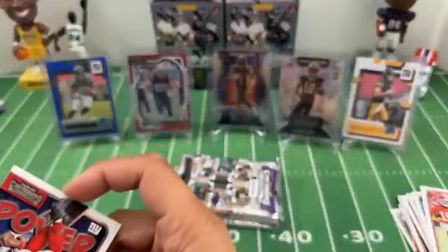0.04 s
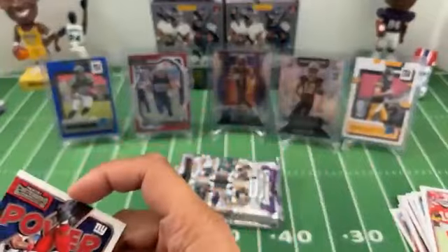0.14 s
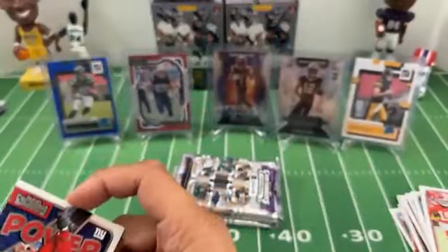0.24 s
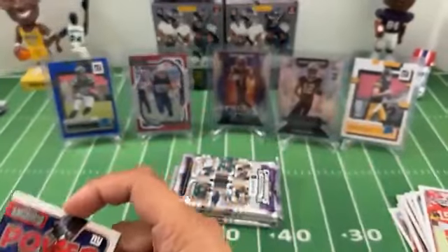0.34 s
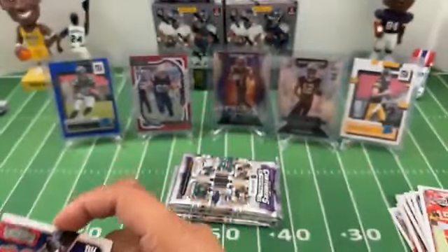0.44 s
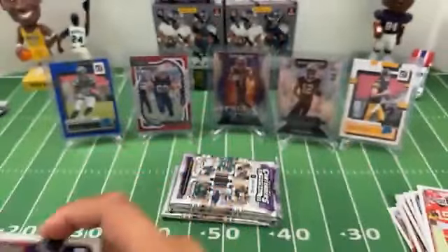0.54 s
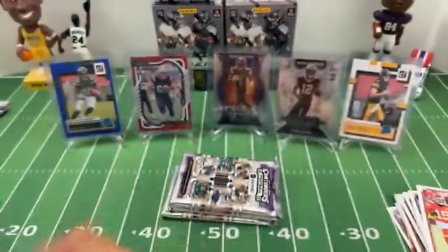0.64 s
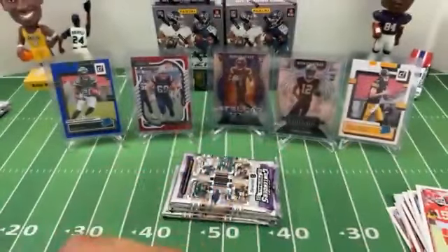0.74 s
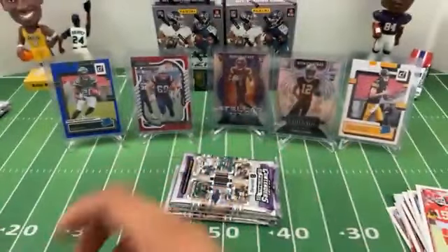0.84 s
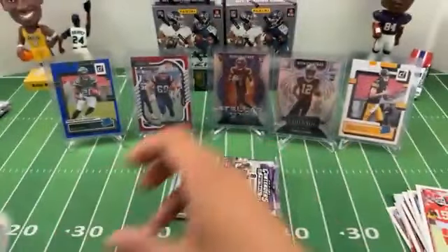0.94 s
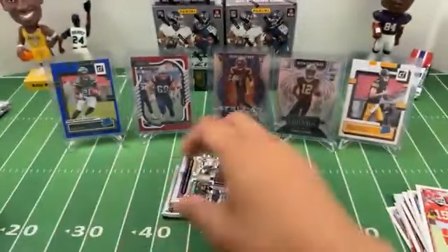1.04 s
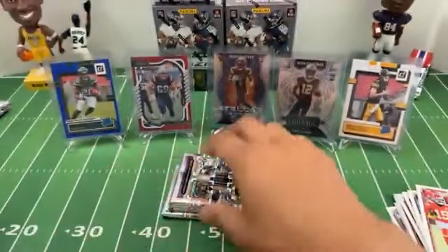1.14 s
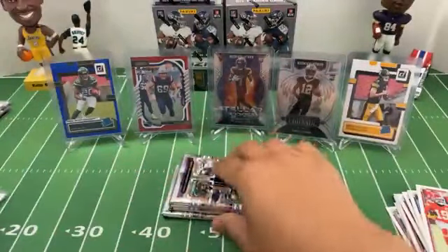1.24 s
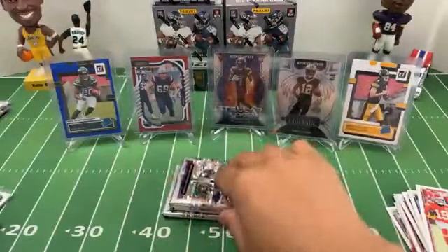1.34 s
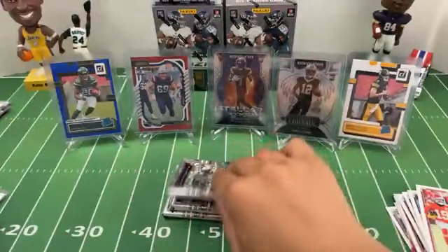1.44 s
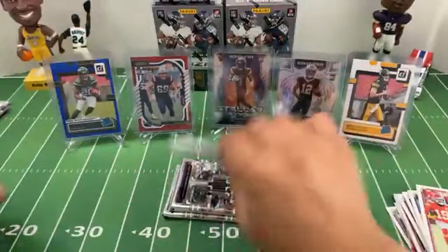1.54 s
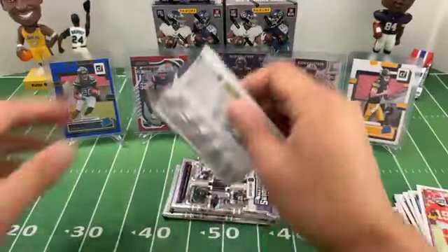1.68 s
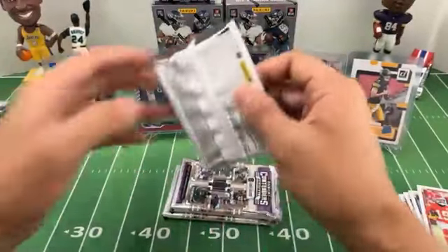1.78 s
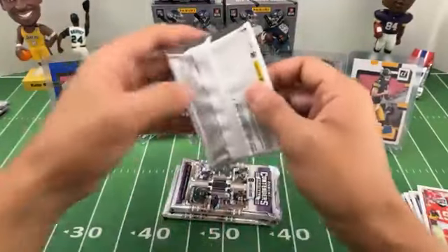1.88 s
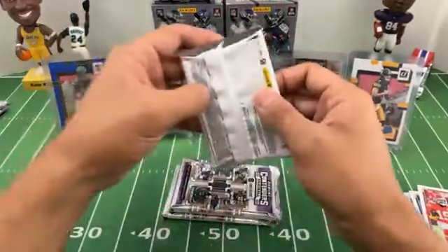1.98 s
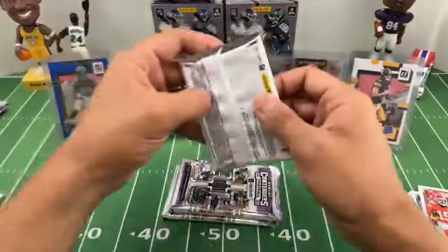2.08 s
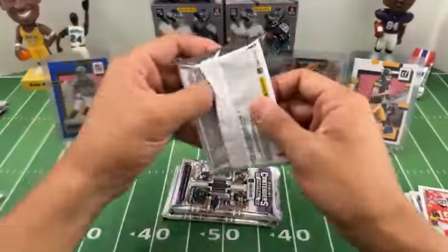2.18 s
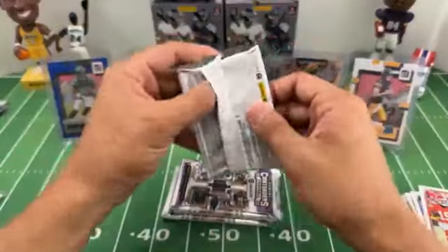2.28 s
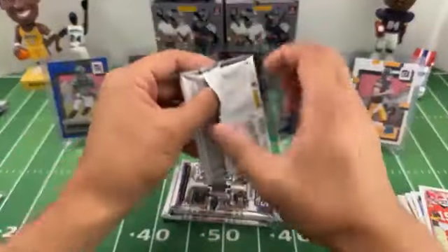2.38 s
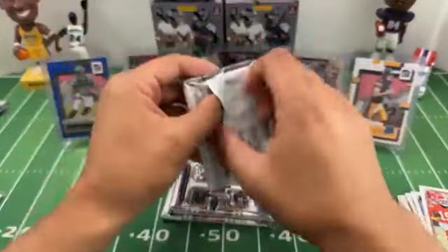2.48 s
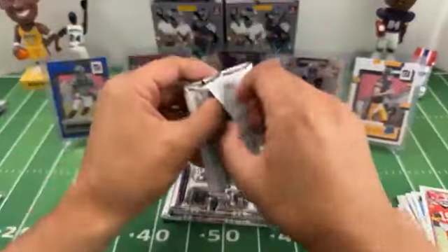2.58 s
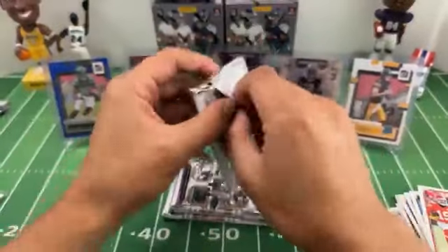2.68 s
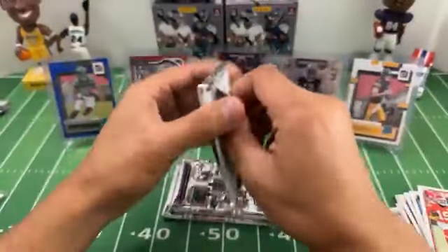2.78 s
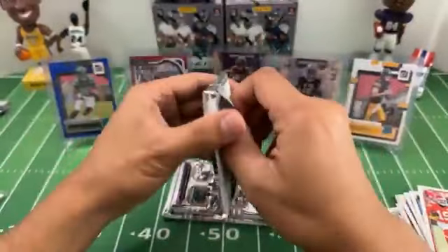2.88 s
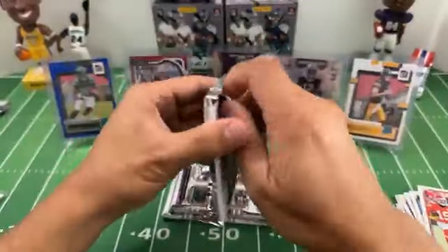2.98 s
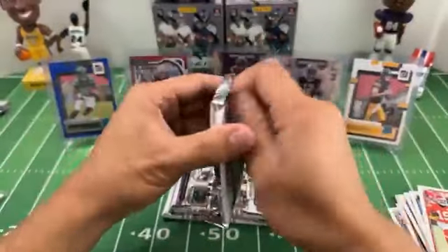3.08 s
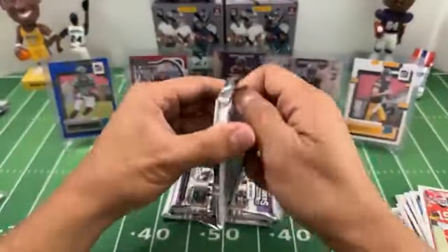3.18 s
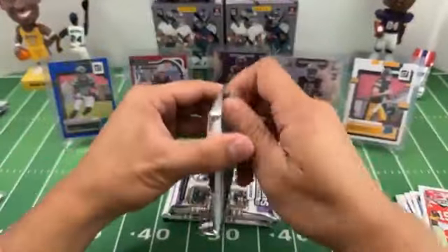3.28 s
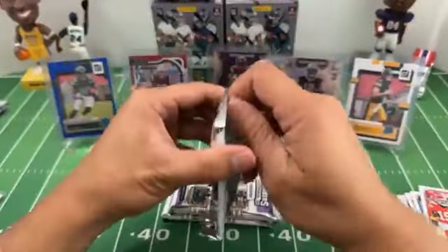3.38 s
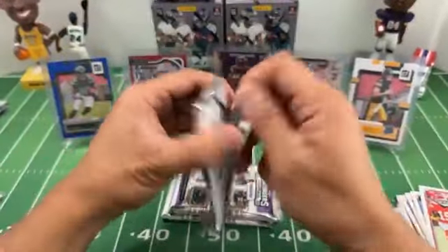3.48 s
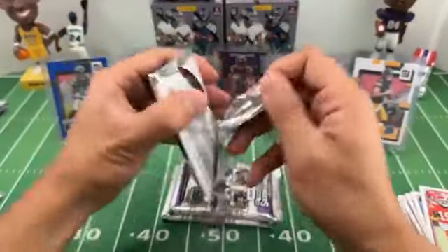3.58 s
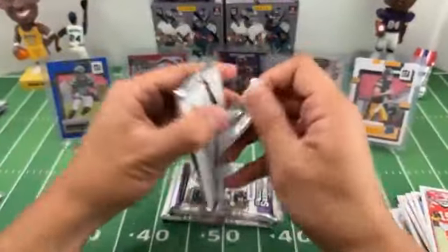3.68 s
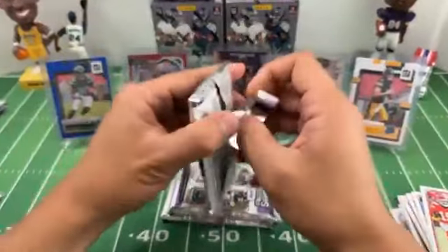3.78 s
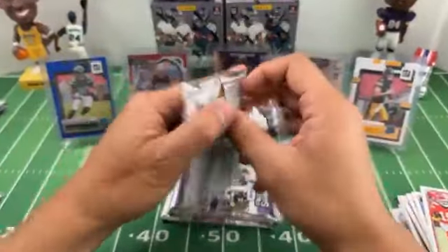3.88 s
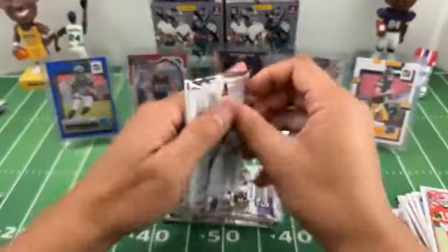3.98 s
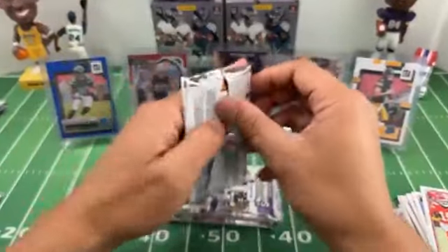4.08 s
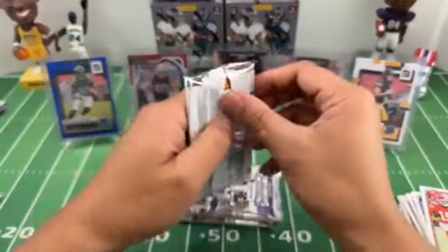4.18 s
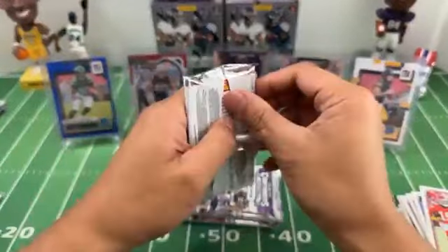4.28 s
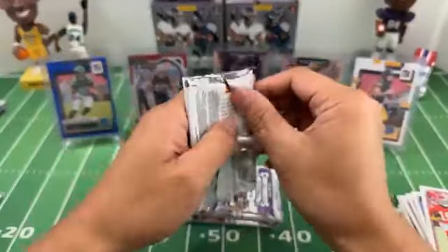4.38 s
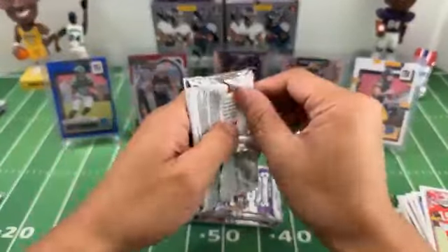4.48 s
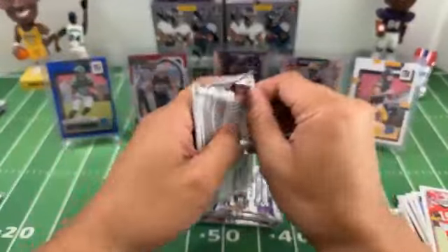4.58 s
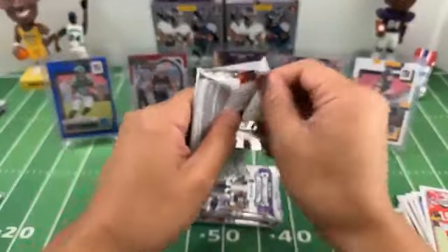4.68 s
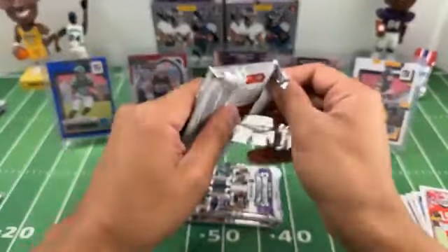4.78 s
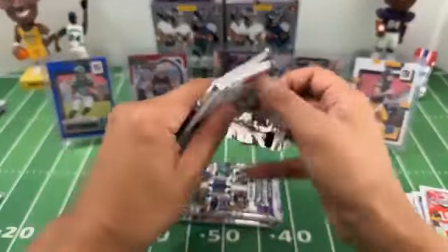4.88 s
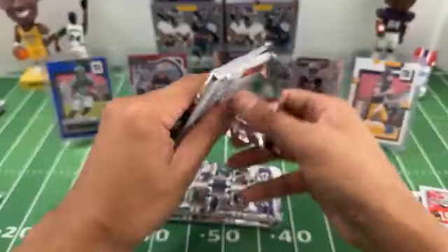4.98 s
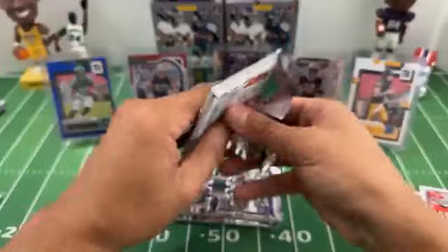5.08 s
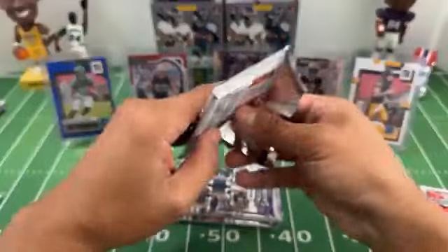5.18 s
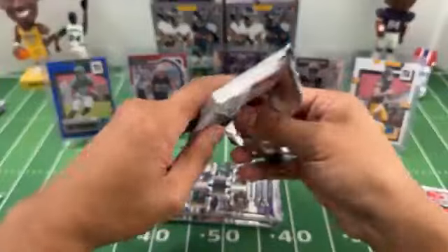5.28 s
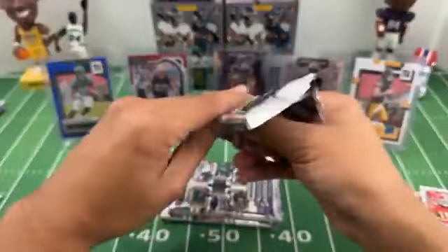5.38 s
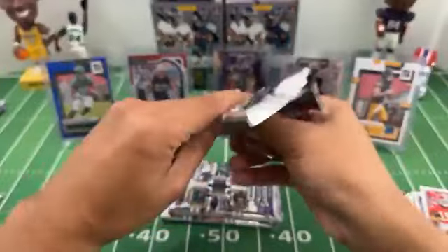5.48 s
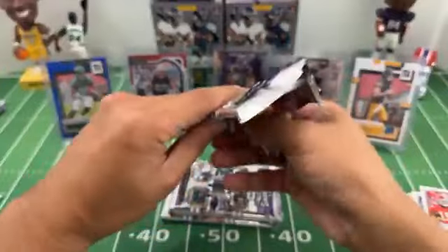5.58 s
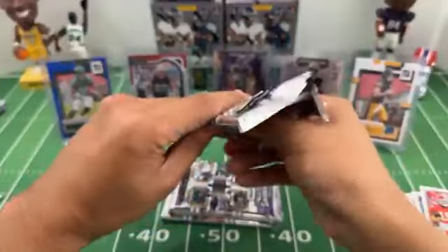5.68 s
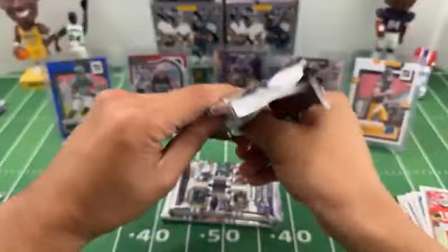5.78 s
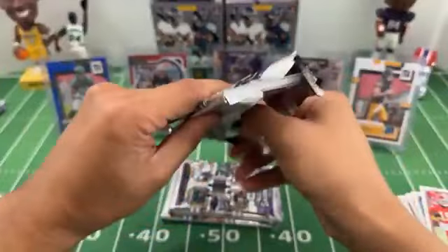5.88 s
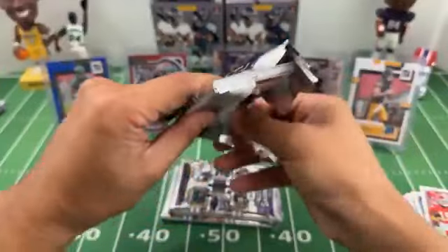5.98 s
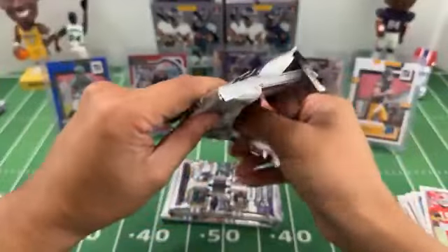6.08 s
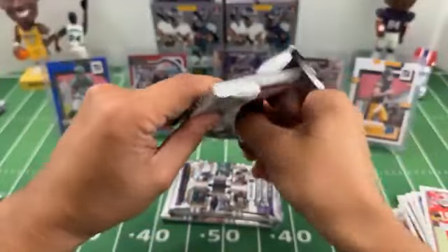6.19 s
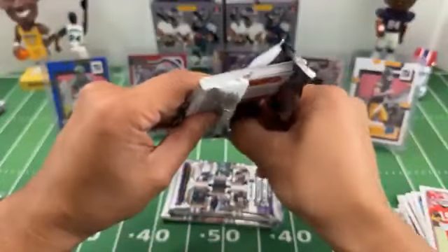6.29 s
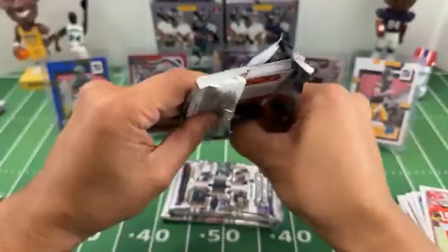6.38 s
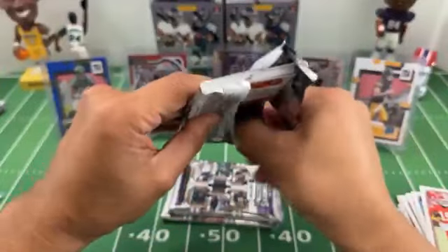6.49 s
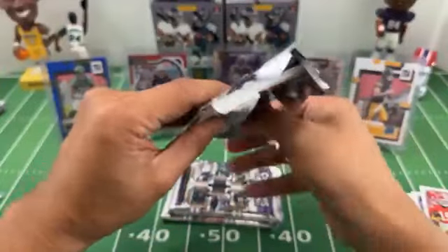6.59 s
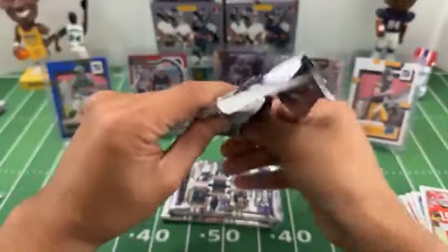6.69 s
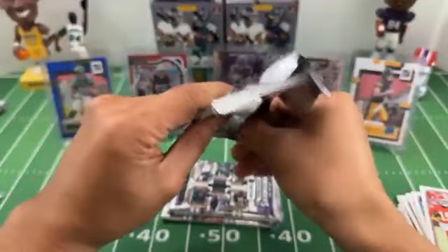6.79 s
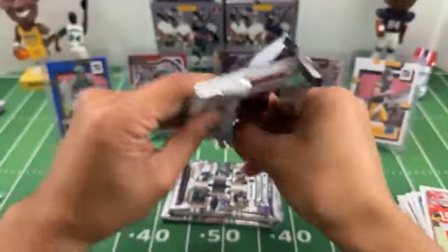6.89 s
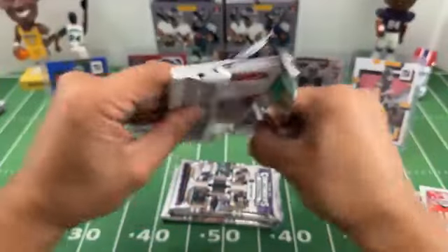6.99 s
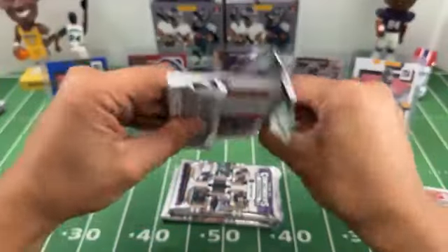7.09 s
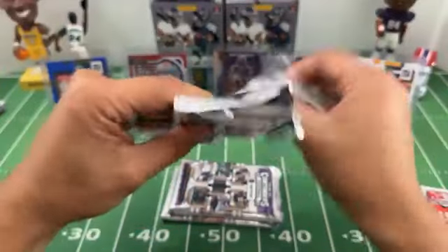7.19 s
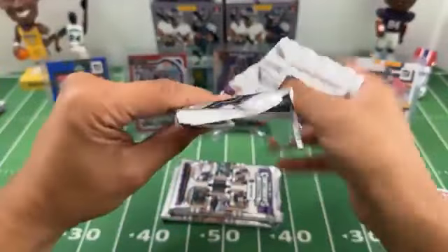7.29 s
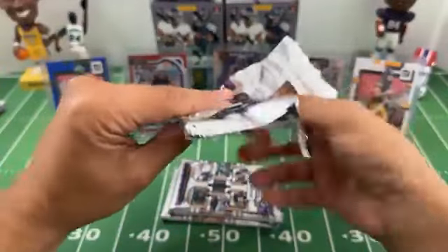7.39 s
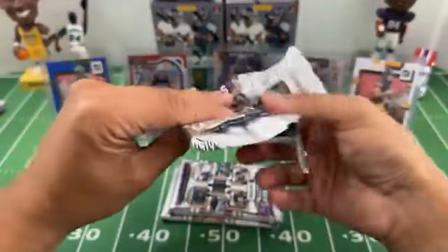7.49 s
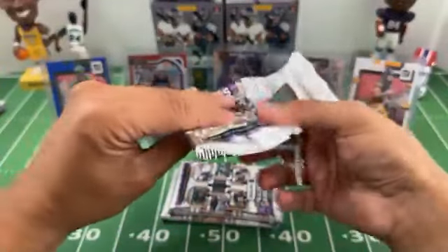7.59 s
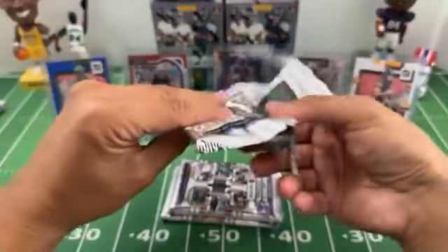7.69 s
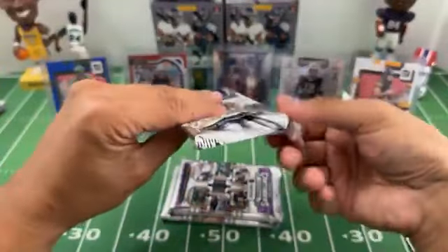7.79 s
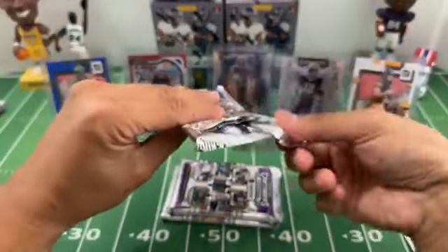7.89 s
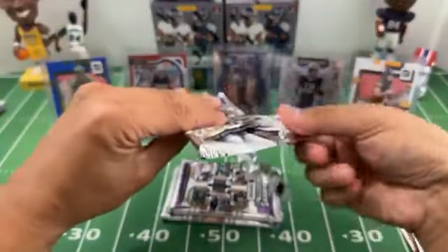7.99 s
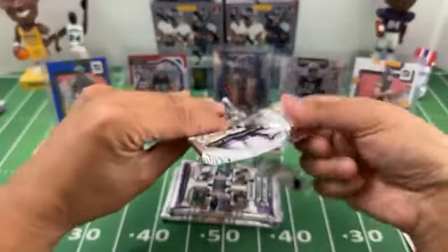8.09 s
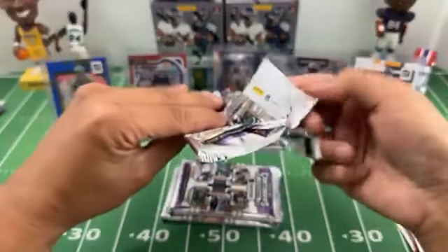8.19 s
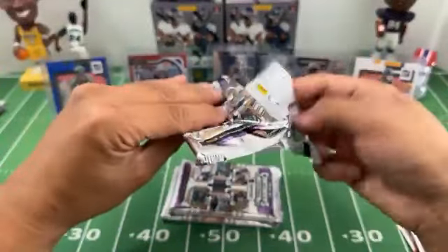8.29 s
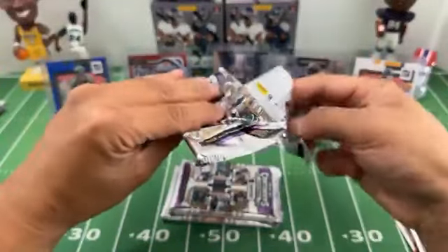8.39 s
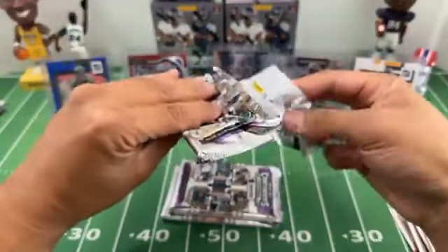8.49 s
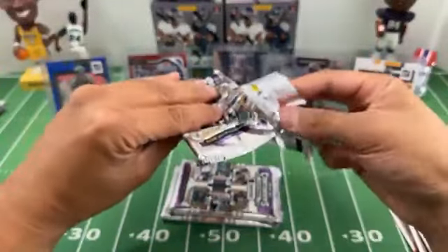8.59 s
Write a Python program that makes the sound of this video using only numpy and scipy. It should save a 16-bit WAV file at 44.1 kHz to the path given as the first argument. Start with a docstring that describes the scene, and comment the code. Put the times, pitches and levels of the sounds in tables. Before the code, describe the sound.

Quiet card taps and soft sliding give way to bright, crackling foil as hands work open and peel back a small wrapper in a small room.

```python
"""A small room with a faint hiss and mains hum; hands over a desk, close to a camera's microphone.
They put down a few cards, pick up a foil card pack, pinch its seam and tear it open in several pulls.
Foil facets buckle in sharp noise bursts that ring their modes, over a bed of tiny creases and sliding
hiss; the stiff pack bumps softly as damped low tones. Treble of the crinkling spreads to the sides."""
import sys
import numpy as np
from scipy import signal
from scipy.fft import rfft, irfft, next_fast_len
from scipy.io import wavfile
from scipy.ndimage import uniform_filter1d

SR = 44100
rng = np.random.default_rng(int(sys.argv[2]) if len(sys.argv) > 2 else 0)


def bounce(signal):
    """Save signal as a 16-bit WAV file at the path given by the first command-line argument."""
    frames = np.transpose(np.atleast_2d(signal))
    limited = np.clip(frames, -1, 1)
    pcm = np.round(limited * 32767).astype(np.int16)
    wavfile.write(sys.argv[1], SR, pcm)


N = 381465


def amp(db):
    """Decibels to gain."""
    return 10 ** (np.asarray(db) / 20)


def unit(x):
    """Scale to rms 1."""
    return x / np.sqrt(np.mean(x ** 2) + 1e-20)


def along(points, hz):
    """Read (frequency [Hz], value) points on a log frequency axis."""
    point_hz, value = np.transpose(points)
    return np.interp(np.log(hz + 1), np.log(point_hz + 1), value)


def filtered(x, response):
    """Multiply the spectrum of x by a response of frequency."""
    size = next_fast_len(N + 8192)
    hz = np.fft.rfftfreq(size, 1 / SR)
    return irfft(rfft(x, size) * response(hz), size)[..., :N]


def noise(spectrum):
    """Coloured noise of rms 1; only the shape of the spectrum counts."""
    return unit(filtered(rng.standard_normal(N), lambda hz: amp(along(spectrum, hz))))


def wobble(rate):
    """A random curve of straight lines between knots, rate knots a second."""
    knots = rng.standard_normal(N // 16)
    return np.interp(np.arange(N) * rate / SR, np.arange(len(knots)), knots)


def band(hz, lo_hz, hi_hz, order=3):
    """Causal band-pass response."""
    b, a = signal.butter(order, [lo_hz, hi_hz], "bandpass", analog=True)
    return signal.freqs(b, a, hz)[1]


def resonance(hz, ring_hz, q):
    """Causal response of one mode, 1 at its peak."""
    ratio = hz / ring_hz
    return 1j * ratio / (q * (1 - ratio ** 2) + 1j * ratio)


def placed(times, sounds):
    """Sum short sounds, one a row, at their start times in seconds."""
    first = np.round(np.maximum(times, 0) * SR).astype(int)
    index = first[:, None] + np.arange(sounds.shape[1])
    return np.bincount(index.ravel(), sounds.ravel(), N)[:N]


# colour of the faint background hiss: (frequency [Hz], relative level [dB per Hz])
HISS_COLOUR = [(20, -30), (42, -19), (62, -4), (100, -5), (200, -9), (400, -19), (900, -25), (2800, -32),
               (5000, -26.5), (9000, -31), (13000, -70)]
# mains hum tones: (frequency [Hz], rms level before its wander [dB])
HUM_TONES = [(119.8, -73.7), (60, -86)]


def background():
    """Faint background hiss as coloured noise, and mains hum as two sines whose level wanders together."""
    t = np.arange(N) / SR
    tones = sum(amp(db) * np.sqrt(2) * np.sin(2 * np.pi * hz * t) for hz, db in HUM_TONES)
    hum = tones * amp(1.3 * wobble(9))
    return amp(-73.0) * noise(HISS_COLOUR) + hum


ROOM_DB = -6  # gain of the room's answer re the direct sound

# how long the room rings: (frequency [Hz], time to fall 60 dB [s])
ROOM_T60 = [(150, 0.32), (600, 0.26), (2000, 0.26), (6000, 0.27), (12000, 0.37)]


def room(x, size=8192):
    """The diffuse answer of the room: decaying noise, drawn anew so no fixed tones build up."""
    pieces = np.pad(x, (0, -N % size)).reshape(-1, size)  # one tail for each short stretch
    hz, t, z = signal.stft(rng.standard_normal((len(pieces), 2 * size)), SR, nperseg=256)
    decay = amp(-60 * t / along(ROOM_T60, hz)[:, None])
    onset = 1 - np.exp(-t / 0.00039)
    tails = signal.istft(z * decay * onset, SR, nperseg=256)[1]
    tails /= np.linalg.norm(tails, axis=1, keepdims=True)
    starts_s = np.arange(len(pieces)) * size / SR
    return placed(starts_s, signal.fftconvolve(pieces, tails, axes=1))


DESK_DB, DESK_DELAY_S, DESK_SWING = -10, .0007, .25  # gain, median delay and its log spread


def desk(x):
    """One early reflection from the desk, its delay swinging with the height of the hands."""
    n = np.arange(N)
    delay_s = DESK_DELAY_S * np.exp(DESK_SWING * wobble(5))
    mirrored = np.interp(n - SR * delay_s, n, x)
    reflection = filtered(mirrored, lambda hz: hz / (hz + 900))  # less bass comes back
    return (x + amp(DESK_DB) * reflection) / np.hypot(1, amp(DESK_DB))


# soft knocks of hands, cards and pack: (time [s], level before a 2 dB cut [dB], pitch [Hz])
KNOCKS = [(0.052, -50.5, 350), (0.125, -47, 350), (0.367, -49, 361), (1.021, -54, 155), (1.42, -61.5, 141),
          (1.487, -62, 90), (2.135, -49.5, 247), (2.137, -42.5, 88.4), (2.535, -46.5, 219),
          (2.544, -47.5, 122), (3.085, -31, 766), (3.654, -37, 220), (3.664, -40.5, 71), (5.07, -43, 573),
          (5.086, -38, 405), (5.142, -50, 470), (5.351, -55, 91), (5.579, -41, 374), (5.608, -37.5, 417),
          (6.099, -40, 318), (6.124, -36, 364), (7.12, -35, 430), (7.152, -35, 495), (7.172, -37, 83.5),
          (7.59, -33, 566), (7.954, -36, 390), (8.031, -43.5, 110.3), (8.343, -49, 79.5)]


def bumps(rise=1.2, cycles=14.5, rough=0.83):
    """A soft knock swells and dies within a few cycles, its phase blurred by the damping of the hand."""
    s, db, hz = np.transpose(KNOCKS)
    turns = hz[:, None] * np.arange(SR // 4) / SR
    shape = (1 - np.exp(-(turns / rise) ** 2)) * amp(-60 * turns / cycles)  # falls 60 dB in `cycles`
    blur = np.array([np.interp(u, np.arange(256), rng.standard_normal(256)) for u in turns])
    push = np.sin(2 * np.pi * turns + rough * blur)
    return placed(s, amp(db - 2.0)[:, None] * shape / shape.max() * push)


def patchy(x, depth_db=3.2):
    """A scrape catches on one spot after another, and each spot has its own colour."""
    z = signal.stft(x, nperseg=512)[2]
    field = uniform_filter1d(rng.standard_normal(z.shape), size=6, axis=0)
    field = uniform_filter1d(field, size=5, axis=1)
    return unit(signal.istft(z * amp(depth_db * unit(field)), nperseg=512)[1][:N])


# colour of card sliding on card or foil: (frequency [Hz], relative level [dB per Hz])
SLIDE_COLOUR = [(300, -13), (1200, -11.5), (2900, -9), (4000, -1.5), (5500, -1.5), (8000, -5.5),
                (10000, -15), (13000, -27)]
# cards and packs sliding over each other:
# (start [s], end [s], stroke gain before slips [dB], glossy sheen before halving [dB re stroke])
SLIDE_STROKES = [(0.47, 0.72, -71.5, -4), (0.737, 0.924, -68.5, -1), (1.093, 1.42, -75.5, -18),
                 (1.358, 1.707, -67, -20), (1.633, 1.78, -63.5, -11), (1.803, 1.917, -67, -15.5),
                 (2.277, 2.358, -65, -17), (7.666, 7.743, -47, -14), (8.268, 8.316, -53, -10)]


def sliding():
    """Cards and packs hiss as they slide, each stroke swelling and fading in uneven little slips."""
    t = np.arange(N) / SR
    start, end, db, sheen_db = np.transpose(SLIDE_STROKES)[..., None]
    progress = np.clip((t - start) / (end - start), 0, 1)
    strokes = amp(db) * np.sin(np.pi * progress)
    sheen = unit(filtered(rng.standard_normal(N), lambda hz: band(hz, 6900, 12500)))
    rub = strokes.sum(axis=0) * patchy(noise(SLIDE_COLOUR))
    gloss = (amp(sheen_db) * strokes).sum(axis=0) * sheen / 2
    slips = amp(2.5 * wobble(220) + 1.5 * wobble(25))
    return (rub + gloss) * slips


# colour of the pack shifting in the grip: (frequency [Hz], relative level [dB per Hz])
HANDLING_COLOUR = [(25, -26), (60, -35.5), (90, 6.5), (170, -2), (400, -4.5), (800, -24), (2000, -2),
                   (9000, -17)]


def pack_shifting(flex_db):
    """The pack shifts in the grip: coloured noise that follows the flexing of the sheet."""
    return amp(flex_db - 7.0) * noise(HANDLING_COLOUR)


def grip(crinkle_db, yield_db=-71, soft_db=4.5):
    """Near 0 while the fingers only slide, near 1 once they press hard enough to crease the foil."""
    return 1 / (1 + np.exp((yield_db - crinkle_db) / soft_db))


def scuffing(crinkle_db, flex_db):
    """Fingers scuff the sheet: patchy noise that gives way to creasing as the grip hardens."""
    # (frequency [Hz], relative level [dB per Hz])
    scuff_colour = [(150, 1.5), (350, 3.0), (1100, -8.5), (2500, -3.0), (6000, -37)]
    sliding_share = 1 - grip(crinkle_db, yield_db=-65.5)
    return sliding_share * amp(flex_db + 6.1 * wobble(70)) * patchy(noise(scuff_colour))


# a squeeze takes hold, is held, and lets go
ATTACK_S, RELEASE_DB_PER_S, FLEX_RELEASE_DB_PER_S = .011, 260, 197
# after a snap the foil goes on creasing and flexing, and settles; levels re the snap
SETTLE_DB, SETTLE_FLEX_DB, SETTLE_DB_PER_S = -29, -10, 279.5

# squeezes and pulls of the fingers: cards put down and pack picked up, seam pinched until it gives,
# prised open, the long rip, the wrapper peeled back. Levels drive the layers, before their own gains:
# (start [s], length [s], crinkle level [dB], sheet flex level [dB])
FINGER_SQUEEZES = [(0.032, .34, -70, -70), (0.8, .05, -69, -73), (0.865, .03, -59, -63.5),
                   (1.404, .1, -73, -71), (1.679, .04, -58, -72.5), (2.311, .06, -53, -66.5),
                   (2.375, .06, -41, -60), (2.717, .09, -48, -61), (2.843, .045, -45, -58.5),
                   (2.919, .3, -54, -69.5), (3.08, .05, -45, -78), (3.243, .07, -41, -54),
                   (3.439, .04, -43, -69), (3.501, .13, -51, -68), (3.651, .07, -35, -38),
                   (3.771, .12, -47, -55.5), (4.005, .11, -47.5, -53.5), (4.207, .13, -64, -69.5),
                   (4.37, .13, -71, -78.5), (4.528, .05, -53, -54), (4.719, .07, -41, -52),
                   (4.822, .07, -50, -51.5), (4.892, .035, -35, -53.5), (5.055, .045, -43, -50.5),
                   (5.187, .21, -52, -55.5), (5.431, .03, -44, -51.5), (5.521, .1, -45, -53),
                   (5.663, .045, -39, -52.5), (5.844, .085, -40, -48), (6.06, .06, -46, -49),
                   (6.181, .06, -45, -51), (6.311, .19, -51, -57.5), (6.653, .14, -53, -51.5),
                   (6.856, .12, -44, -50), (7.041, .145, -41, -50.5), (7.106, .035, -33.5, -42.5),
                   (7.292, .04, -49, -56), (7.349, .06, -48.5, -44), (7.448, .43, -63, -60.5),
                   (7.578, .03, -51, -45), (7.903, .14, -54, -58), (8.05, .08, -50, -55),
                   (8.172, .05, -60, -59.5), (8.428, .035, -52, -61), (8.28, .29, -61, -59.5),
                   (8.325, .03, -50, -63), (8.604, .045, -58, -49.5)]


def work():
    """Crinkle and flex levels in dB per sample: the squeezes, and the settling after each snap."""
    t = np.arange(0, N, 32) / SR
    start, length, crinkle_db, flex_db = np.transpose(FINGER_SQUEEZES)[..., None]
    s, snap_db, snap_flex_db = np.transpose(FOIL_SNAPS)[:3, :, None]
    taking_hold = np.clip(1 + (t - start) / ATTACK_S, 0, 1)
    let_go_s = np.maximum(t - start - length, 0)
    settling = (t > s) * amp(-SETTLE_DB_PER_S * np.abs(t - s))

    def level(held_db, release_db_per_s, settle_db):
        """Add the power of all squeezes and settlings."""
        squeezed = taking_hold * amp(held_db - release_db_per_s * let_go_s)
        parts = np.vstack([squeezed, settling * amp(settle_db)])
        level_db = 10 * np.log10(np.sum(parts ** 2, axis=0) + 1e-10)
        return np.interp(np.arange(N) / SR, t, level_db)

    crinkling = level(crinkle_db, RELEASE_DB_PER_S, snap_db + SETTLE_DB)
    flexing = level(flex_db, FLEX_RELEASE_DB_PER_S, snap_db + snap_flex_db + SETTLE_FLEX_DB)
    return crinkling, flexing


OVERTONE_DB, OVERTONE_Q = 6, 9


def overtones(hz, facets, count=3):
    """The further modes of each facet, one response a row: no two facets have the same shape."""
    low_hz, high_hz = 1500, 10000
    position = (np.arange(count)[:, None] + rng.random((facets, count, 1))) / count
    modes_hz = low_hz * (high_hz / low_hz) ** position
    return amp(OVERTONE_DB) * resonance(hz, modes_hz, OVERTONE_Q).sum(axis=1)


SNAP_S = .0054  # each part of a buckle has its energy set as rms 1 over this time
STUTTER_DB = 2.6  # a fold runs across its facet in uneven jerks
SHEET_DB, SHEET_HZ, SHEET_OCTAVES, SHEET_Q = 9, 340, 1.5, 8  # one low sheet mode, this pitch upwards


def buckles(level_db, flex_db, edge_db, ring_hz, t60, rise, linger, ring_db, ring_q, dulling, size=1024):
    """A facet flips: a crack that rings it, a crisp edge, and a slower flex of the sheet around it."""
    t, hz = np.arange(size) / SR, np.fft.rfftfreq(size, 1 / SR)
    settings = level_db, flex_db, edge_db, ring_hz, t60
    level_db, flex_db, edge_db, ring_hz, t60 = (np.reshape(v, (-1, 1)) for v in settings)
    jerks = amp(STUTTER_DB * rng.standard_normal((len(t60), size // 32))).repeat(32, axis=1)

    def burst(life, response):
        """Jerky noise that rises and decays, then drives the response."""
        shape = (1 - np.exp(-(t / rise) ** 2)) * amp(-60 * t / life)
        y = irfft(rfft(rng.standard_normal(shape.shape) * shape * jerks) * response)
        return y / np.sqrt(np.sum(y ** 2, axis=1, keepdims=True) / (SNAP_S * SR))

    facet = 1 + amp(ring_db) * resonance(hz, ring_hz, ring_q)
    # a slack sheet that flexes much cracks duller than a taut one
    slackness = np.clip(flex_db + 24.0, -12, 10)
    tilt = amp(-dulling * slackness * np.log2(np.clip(hz, 1400, 4500) / 4000))
    crack = burst(t60, band(hz, 1164, 7700) * (facet + overtones(hz, len(ring_hz))) * tilt)
    edge = burst(t60, band(hz, 6270, 12200))
    sheet_hz = SHEET_HZ * 2 ** (SHEET_OCTAVES * rng.random(t60.shape))
    sheet = amp(SHEET_DB) * resonance(hz, sheet_hz, SHEET_Q)
    flex = burst(linger * t60, band(hz, 330, 1580) * (facet + sheet))
    return amp(level_db) * (crack + amp(edge_db) * edge + amp(flex_db) * flex)


CREASE_DB, CREASE_SCATTER_DB, CREASE_T60_S = -6, 4.3, .016  # gain, spread of strength, median life
CREASE_HZ, CREASE_DROP_OCT_PER_DB = 4500, 0.84  # facets ring lower the more the sheet flexes
CREASE_RING_DB, CREASE_RING_Q = 11, 8
SAME_FOLD_SHARE, SAME_FOLD_SPREAD = .45, .06  # share of creases near a snap's pitch, log spread


def creases(crinkle_db, flex_db, count=1700):
    """Tiny buckles at random: harder work makes them both denser and louder."""
    density = amp(.3 * crinkle_db) * (grip(crinkle_db) + .25)
    rate = density * count * SR / density.sum()  # creases a second
    ticks = np.arange(count) + 2 * rng.random(count)
    at = np.searchsorted(np.cumsum(rate) / SR, ticks).clip(0, N - 1)
    strength, facet, bright, slack = rng.standard_normal((4, count)).clip(-2, 2)
    # share the crinkle power among the creases
    level_db = crinkle_db[at] - 10 * np.log10(rate[at] * SNAP_S) + CREASE_SCATTER_DB * strength
    sheet_db = flex_db[at] - crinkle_db[at]

    # some creases run along the fold of the nearest snap and ring like it
    snap_s, _, _, _, snap_hz, _ = np.transpose(FOIL_SNAPS)
    nearest = np.abs(at[:, None] / SR - snap_s).argmin(axis=1)
    fold_hz = snap_hz[nearest] * np.exp(SAME_FOLD_SPREAD * facet)
    # the ring of the others wanders together
    drop_oct = CREASE_DROP_OCT_PER_DB * np.maximum(sheet_db + 12.5, 0)
    free_hz = CREASE_HZ * np.exp(0.22 * facet + 0.32 * wobble(35)[at]) * 2 ** -drop_oct
    ring_hz = np.where(rng.random(count) < SAME_FOLD_SHARE, fold_hz, free_hz)

    t60 = CREASE_T60_S * np.exp(0.72 * slack)
    sounds = buckles(level_db, sheet_db - 4.0 + 2.0 * slack, -7 + 1.8 * bright, ring_hz, t60,
                     rise=0.000082, linger=1.57, ring_db=CREASE_RING_DB, ring_q=CREASE_RING_Q,
                     dulling=0.068, size=512)
    return amp(CREASE_DB) * placed(at / SR, grip(crinkle_db[at])[:, None] * sounds)


CRACK_DB, FLEX_DB, EDGE_DB = -14, 9.5, 13  # gains added to the table's strength, flex and edge
SNAP_RING_DB, SNAP_RING_Q = 10, 7
# neighbouring facets: gain re the snap, furthest offset, life re the snap's
LEAD_DB, LEAD_S, LEAD_LIFE = -14, .0052, 1
FOLLOW_DB, FOLLOW_S, FOLLOW_LIFE = -11, .007, 1

# the clearest single buckles of the foil, the first few of them ticks of cards; before the gains above:
# (time [s], strength [dB], sheet flex [dB re strength], crisp edge [dB re strength],
#  facet ring [Hz], time for the crack to fall 60 dB [s])
FOIL_SNAPS = [(0.044, -46, -13, -11.5, 1005, 0.023), (0.05, -39, -10.5, -11, 895, 0.019),
              (0.118, -48, -5, -10, 1107, 0.022), (0.1257, -48, -9, -13, 960, 0.016),
              (0.197, -41, -18, -42, 3840, 0.03), (0.252, -32, -42.5, -14.5, 8430, 0.014),
              (0.3289, -31, -20, -10.5, 8650, 0.0098), (0.3649, -39, -15, -25, 1036, 0.015),
              (0.5724, -46, -12, -30, 1230, 0.0076), (0.868, -30, -24, -9.5, 8040, 0.012),
              (0.9619, -34.5, -24, -11.5, 6160, 0.0098), (1.3132, -47, -18.5, -13, 4900, 0.025),
              (1.408, -53.5, -7.5, -19, 1060, 0.027), (1.4583, -51, -16, -25, 1167, 0.015),
              (1.5556, -50, -27, -19, 5150, 0.016), (1.6541, -41, -24.5, -21, 5200, 0.018),
              (1.6847, -38.5, -18, -12, 5660, 0.014), (1.842, -34.5, -23, -18.5, 7100, 0.01),
              (2.0797, -43, -15, -10.5, 3330, 0.04), (2.2769, -50, -10, -13, 1560, 0.013),
              (2.364, -29.5, -31.5, -34, 4200, 0.016), (2.38, -20.5, -43, -40, 4200, 0.017),
              (2.416, -27, -44, -31, 4590, 0.016), (2.4374, -27.5, -44, -28, 5360, 0.014),
              (2.5401, -30, -19, -22, 5900, 0.0081), (2.6579, -40, -15, -17, 3540, 0.018),
              (2.7106, -31, -46, -19, 3600, 0.019), (2.7236, -33.5, -27, -24, 3520, 0.015),
              (2.7402, -27, -36, -13, 5250, 0.018), (2.757, -22, -34, -18, 5200, 0.013),
              (2.7904, -23.5, -49, -11, 7600, 0.022), (2.8255, -37, -21, -10, 3650, 0.0099),
              (2.835, -28, -33, -18, 3700, 0.013), (2.8783, -26, -29, -16, 3620, 0.033),
              (2.918, -32.5, -28, -11, 6330, 0.033), (2.9286, -30, -17.5, -20, 3560, 0.023),
              (2.9697, -33.5, -41, -17, 3360, 0.016), (2.9957, -33, -23, -13, 5980, 0.025),
              (3.03, -25, -28.5, -10, 6000, 0.024), (3.0845, -28.5, -27, -18, 3520, 0.013),
              (3.0884, -25, -31, -23, 3570, 0.013), (3.099, -23, -41, -15, 4400, 0.047),
              (3.117, -26, -48, -13, 3630, 0.017), (3.176, -23.5, -34, -16, 5130, 0.02),
              (3.2241, -20, -31.5, -14, 3470, 0.02), (3.2457, -27, -45, -8.5, 3500, 0.032),
              (3.27, -22, -30, -15, 3370, 0.066), (3.2794, -23, -31, -13, 6200, 0.078),
              (3.4127, -41, -14.5, -30, 2140, 0.053), (3.435, -19.5, -37, -12, 5040, 0.023),
              (3.4548, -28.5, -17.5, -10, 3560, 0.011), (3.4699, -23.5, -37, -15, 5270, 0.018),
              (3.5027, -21, -51, -29, 5200, 0.033), (3.545, -26.5, -33, -15.5, 4370, 0.017),
              (3.5845, -20, -30.5, -19, 6000, 0.035), (3.5978, -28, -27, -14, 3400, 0.013),
              (3.6243, -21, -27.5, -10.5, 7150, 0.011), (3.645, -12.5, -28, -13, 3250, 0.053),
              (3.6511, -14, -14.5, -15, 4400, 0.02), (3.6685, -22.5, -18, -11, 4660, 0.014),
              (3.715, -22.5, -19, -10, 6100, 0.027), (3.778, -30.5, -33, -11, 4500, 0.0065),
              (3.796, -29.5, -35, -8, 4520, 0.021), (3.8153, -20, -46, -17, 5750, 0.067),
              (3.8411, -22, -17, -13.5, 3060, 0.013), (3.8491, -23.5, -46, -14, 3150, 0.011),
              (3.8835, -28.5, -19, -10, 4480, 0.04), (3.9608, -26, -14.5, -11, 1070, 0.034),
              (4.0163, -22.5, -47, -13, 4530, 0.03), (4.0505, -29, -22.5, -19, 3320, 0.012),
              (4.0608, -29, -29, -8.5, 5870, 0.014), (4.0969, -17, -24.5, -16, 4380, 0.008),
              (4.1057, -23.5, -37, -18, 3400, 0.011), (4.2185, -34, -16, -12, 4300, 0.0062),
              (4.264, -33, -20, -11.5, 4580, 0.0078), (4.52, -42.5, -14, -20, 685, 0.012),
              (4.568, -24, -33, -18.5, 6660, 0.0073), (4.639, -30, -15, -19, 4450, 0.0068),
              (4.6697, -17.5, -29.5, -17, 2940, 0.013), (4.7111, -23.5, -42, -14, 6450, 0.017),
              (4.7203, -22, -13.5, -20, 1210, 0.041), (4.756, -25.5, -23, -14, 6330, 0.0084),
              (4.7626, -19, -33, -17, 6340, 0.012), (4.774, -21.5, -30, -23, 4740, 0.0067),
              (4.782, -22.5, -25.5, -13.5, 6500, 0.022), (4.822, -28.5, -22, -20, 3100, 0.008),
              (4.8304, -25.5, -32, -30, 3000, 0.013), (4.8977, -13, -23, -20, 4500, 0.0057),
              (4.9133, -17, -21, -11.5, 3540, 0.042), (4.9251, -16.5, -29, -16, 4700, 0.02),
              (5.026, -26, -18.5, -15, 4680, 0.043), (5.0377, -28, -20, -20, 6160, 0.0064),
              (5.0569, -26, -16, -14, 4630, 0.045), (5.0742, -26, -28, -30, 4600, 0.011),
              (5.1697, -27, -13, -18, 6170, 0.01), (5.187, -29, -29, -20, 5380, 0.0068),
              (5.192, -27.5, -24, -22, 5300, 0.015), (5.24, -18, -20, -11, 4240, 0.019),
              (5.2936, -25.5, -21, -16, 1320, 0.012), (5.3247, -29, -24, -32, 6200, 0.0072),
              (5.3934, -38, -24, -24, 4740, 0.012), (5.4297, -32, -44, -17, 5430, 0.013),
              (5.4357, -17.5, -48, -15, 4100, 0.022), (5.4482, -26, -34, -15, 3680, 0.0059),
              (5.5129, -25, -17, -18, 3830, 0.019), (5.5389, -27, -17, -21, 4350, 0.0075),
              (5.5559, -19, -26.5, -16.5, 1440, 0.016), (5.5783, -22.5, -33, -18, 4860, 0.031),
              (5.5925, -23.5, -17, -15, 4360, 0.027), (5.6083, -23, -30, -19, 5350, 0.013),
              (5.628, -28.5, -18, -20, 1250, 0.019), (5.6349, -28.5, -20, -19, 5990, 0.011),
              (5.6625, -17.5, -19, -20, 5370, 0.0097), (5.6797, -18, -38, -20, 5500, 0.0042),
              (5.6924, -19, -47, -16, 5370, 0.022), (5.7911, -19.5, -21.5, -14, 5800, 0.03),
              (5.8413, -20, -26.5, -20, 6030, 0.022), (5.852, -16.5, -50, -22, 5600, 0.0068),
              (5.8794, -17.5, -25, -14, 5420, 0.0064), (5.907, -18, -20, -21, 5430, 0.016),
              (5.9165, -19.5, -26, -23, 5900, 0.037), (5.9294, -24, -17, -17, 5800, 0.014),
              (6.023, -40, -20, -30, 2000, 0.024), (6.0693, -33.5, -8.5, -28, 1620, 0.0093),
              (6.097, -20.5, -25, -18, 5440, 0.023), (6.1107, -22.5, -20, -15, 5900, 0.028),
              (6.1546, -24.5, -19, -12, 7700, 0.02), (6.1778, -21.5, -22.5, -24, 3320, 0.032),
              (6.195, -21.5, -32, -19, 3600, 0.015), (6.2045, -26.5, -36, -22, 3400, 0.01),
              (6.2125, -26, -29, -31, 2250, 0.015), (6.2483, -30.5, -27, -28, 5340, 0.0079),
              (6.3261, -26.5, -21, -16, 5800, 0.007), (6.3325, -24, -39, -24, 5660, 0.012),
              (6.347, -21, -31, -21, 2190, 0.013), (6.406, -30.5, -20, -30, 2150, 0.0097),
              (6.4157, -14.5, -28.5, -24, 2080, 0.0078), (6.484, -15.5, -21.5, -19.5, 2040, 0.009),
              (6.5822, -32, -25, -37, 2000, 0.012), (6.671, -35, -12, -20, 3280, 0.011),
              (6.699, -22.5, -16, -15, 5340, 0.013), (6.7223, -24, -23, -19, 1240, 0.013),
              (6.8515, -36.5, -17, -12, 6700, 0.0077), (6.891, -27.5, -24, -27, 3070, 0.008),
              (6.907, -25, -24, -19, 5190, 0.022), (6.9175, -21, -23, -17, 3070, 0.028),
              (6.9476, -20.5, -20.5, -19, 2020, 0.016), (6.963, -28, -24, -14, 4800, 0.016),
              (7.0335, -21.5, -15.5, -14, 2860, 0.015), (7.0446, -16, -31, -24, 5130, 0.021),
              (7.0611, -16.5, -16.5, -14.5, 1210, 0.016), (7.0704, -21, -27, -10, 5160, 0.0051),
              (7.088, -27.5, -31, -14, 3400, 0.011), (7.0915, -23, -22, -24, 2150, 0.019),
              (7.104, -21, -16, -10.5, 3000, 0.02), (7.112, -17.5, -19, -17, 1280, 0.018),
              (7.1163, -12, -14.5, -24, 2170, 0.013), (7.1392, -19, -13.5, -17, 1690, 0.014),
              (7.1424, -17, -30, -14, 2130, 0.014), (7.1819, -23.5, -18, -17, 2160, 0.024),
              (7.194, -20, -19, -34, 2330, 0.023), (7.201, -14, -21, -33, 2030, 0.011),
              (7.2766, -19.5, -16, -17.5, 7400, 0.007), (7.3005, -26, -26, -14, 3500, 0.011),
              (7.3434, -21, -14, -10, 770, 0.026), (7.4468, -35.5, -20, -15, 2370, 0.0071),
              (7.5756, -30, -19, -26, 2200, 0.013), (7.5896, -28, -22, -27, 3070, 0.023),
              (7.5965, -28, -15, -37, 2190, 0.012), (7.608, -33, -14, -13, 624, 0.013),
              (7.7009, -30, -11, -18, 3760, 0.024), (7.8107, -38, -35, -14, 5600, 0.015),
              (7.891, -29.5, -28, -18, 5300, 0.013), (7.9544, -23.5, -17, -23, 4430, 0.017),
              (8.0061, -35.5, -16, -13, 4600, 0.013), (8.042, -24, -21, -22, 1560, 0.015),
              (8.0498, -31, -21, -12, 1480, 0.022), (8.0859, -19, -35.5, -16, 2690, 0.012),
              (8.1799, -41, -7.5, -18, 5360, 0.011), (8.2119, -44, -6, -25, 1460, 0.0095),
              (8.329, -22, -15, -15.5, 794, 0.015), (8.4137, -33, -21, -22.5, 806, 0.019),
              (8.4192, -16.5, -21.5, -18, 6180, 0.011), (8.6, -41, -2, -28, 623, 0.021)]


def snaps():
    """Big buckles, each of its own colour, ragged as nearby facets give way just before and after."""
    s, strength_db, flex_db, edge_db, ring_hz, t60 = np.transpose(FOIL_SNAPS)
    level_db, flex_db, edge_db = strength_db + CRACK_DB, flex_db + FLEX_DB, edge_db + EDGE_DB
    main = buckles(level_db, flex_db, edge_db, ring_hz, t60, rise=0.0007, linger=1.76,
                   ring_db=SNAP_RING_DB, ring_q=SNAP_RING_Q, dulling=0.37)
    total = placed(s, main)
    neighbours = (LEAD_DB, -LEAD_S, LEAD_LIFE), (FOLLOW_DB, FOLLOW_S, FOLLOW_LIFE)
    for neighbour_db, reach_s, life in neighbours:
        when, strength, facet = rng.uniform(-1, 1, (len(s), 3)).T
        flips = buckles(level_db + neighbour_db + 3 * strength, flex_db, edge_db,
                        ring_hz * np.exp(0.36 * facet), life * t60,
                        rise=0.00031, linger=1.4, ring_db=4.5, ring_q=SNAP_RING_Q, dulling=0.43)
        total = total + placed(s + reach_s * (2 + when) / 3, flips)
    return total


SIDE_ROOM_DB, SIDE_DIRECT_DB = -7.5, -10.5  # gains of room and direct sound sent sideways

# colour of the foil as it reaches the microphone: (frequency [Hz], gain [dB])
FOIL_COLOUR = [(200, 15), (420, 1.5), (800, 4), (1000, 2.5), (1220, 2), (1500, -3), (2100, 0.5), (2720, -3),
               (3300, 3.5), (3950, 1), (4400, 2), (6300, 3), (7200, -1), (8600, -1.5), (12500, -11)]


def scene():
    """The foil is straight ahead; the treble of its crinkling and sliding spreads to the sides, and so, more
    faintly, does the room's answer to its snaps."""
    def colour(hz):
        return amp(along(FOIL_COLOUR, hz))

    def treble(hz):
        return np.clip((hz - 4000) / 200, 0, 1)

    crinkle_db, flex_db = work()
    rubbing = sliding() + scuffing(crinkle_db, flex_db) + pack_shifting(flex_db)
    rustle = filtered(creases(crinkle_db, flex_db), colour) + rubbing
    cracks = filtered(snaps(), colour)
    foil, knocks = cracks + rustle, bumps()
    mid = desk(foil) + knocks + amp(ROOM_DB) * room(foil + knocks) + background()
    side_room = amp(SIDE_ROOM_DB) * room(rustle + cracks / 2)
    side_direct = amp(SIDE_DIRECT_DB) * rustle * wobble(2000)
    side = filtered(side_room + side_direct, treble)
    return np.array([mid + side, mid - side])  # left, right


TOP_HZ = 13150  # the camera's band limit


def record(dry):
    """The camera drops the deepest rumble and cuts steeply above its band limit."""
    def camera(hz):
        return band(hz, 36, 40000, order=2) / np.sqrt(1 + (hz / TOP_HZ) ** 120)

    return filtered(dry, camera)


dry = scene()
out = record(dry)
bounce(out)
```